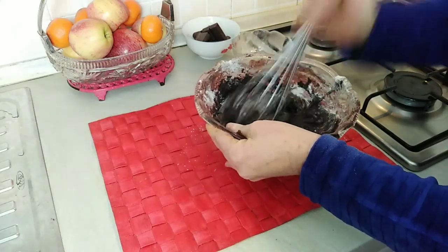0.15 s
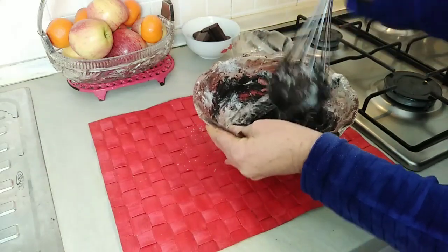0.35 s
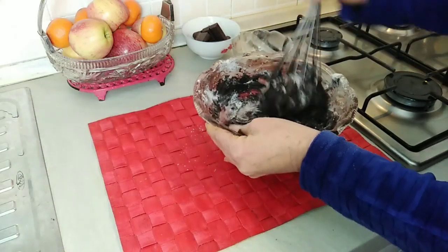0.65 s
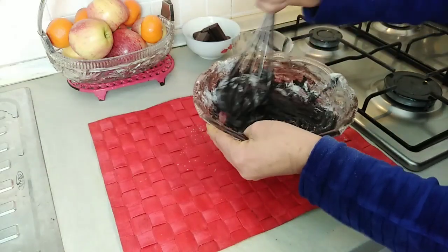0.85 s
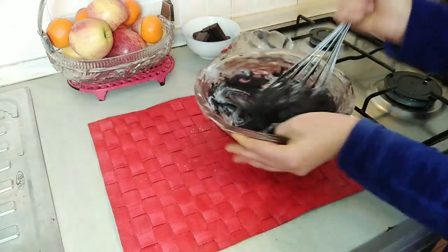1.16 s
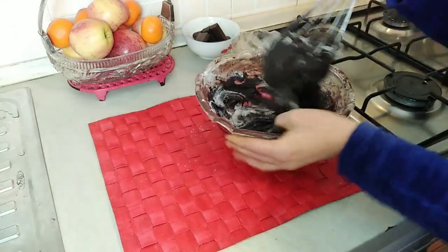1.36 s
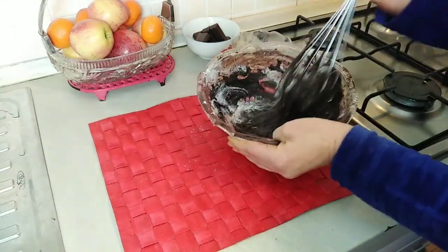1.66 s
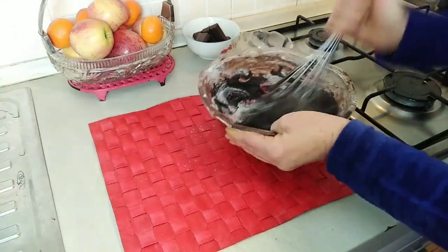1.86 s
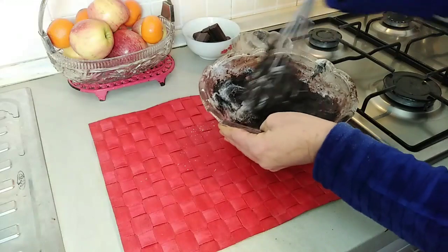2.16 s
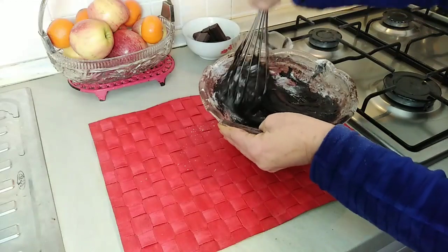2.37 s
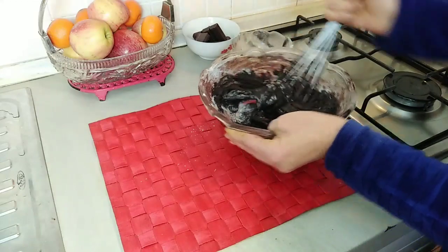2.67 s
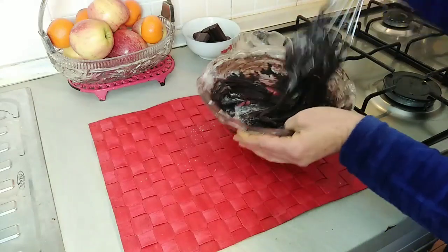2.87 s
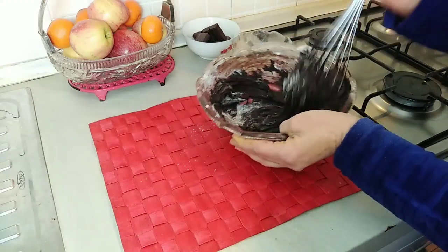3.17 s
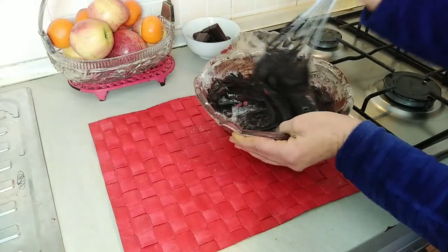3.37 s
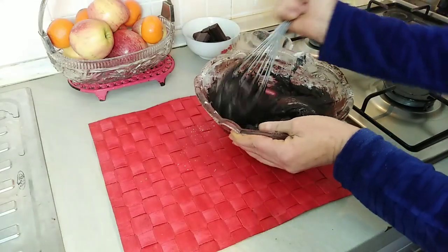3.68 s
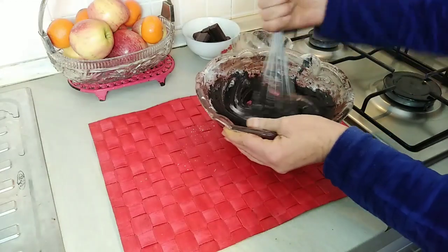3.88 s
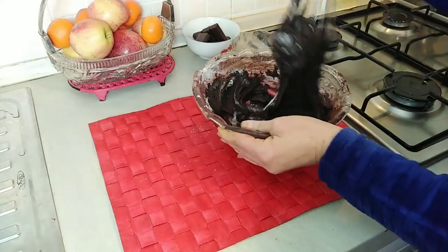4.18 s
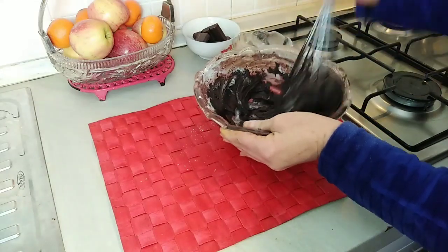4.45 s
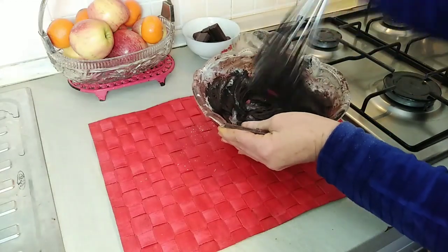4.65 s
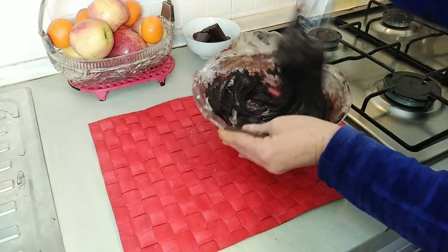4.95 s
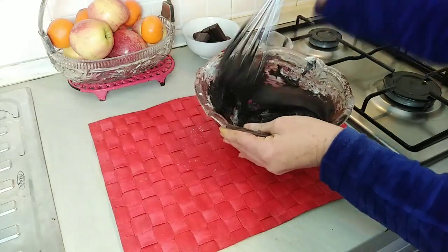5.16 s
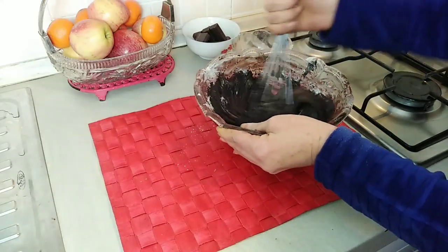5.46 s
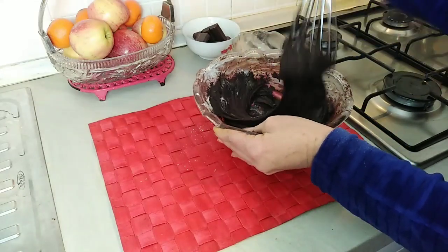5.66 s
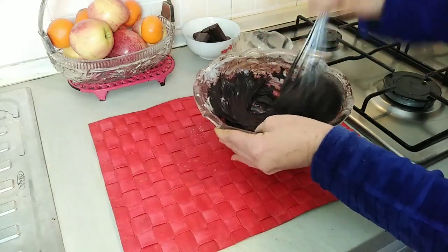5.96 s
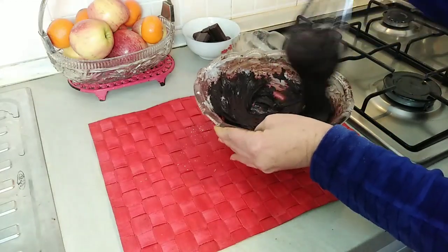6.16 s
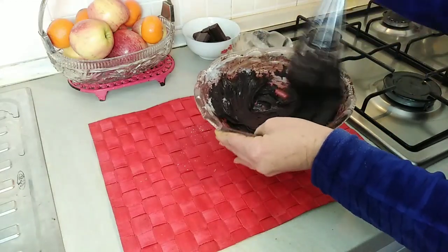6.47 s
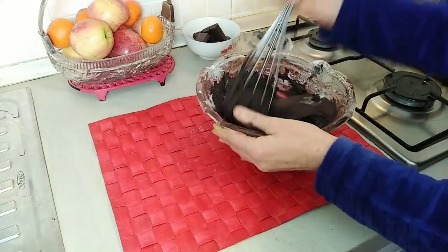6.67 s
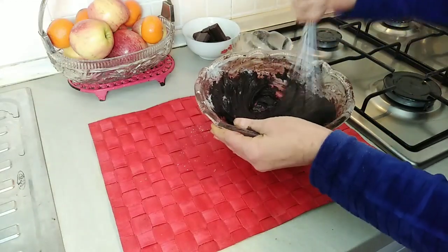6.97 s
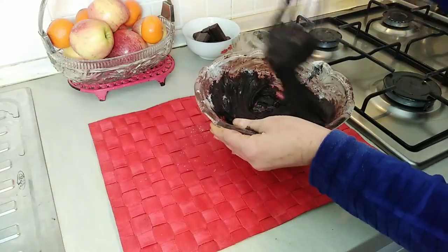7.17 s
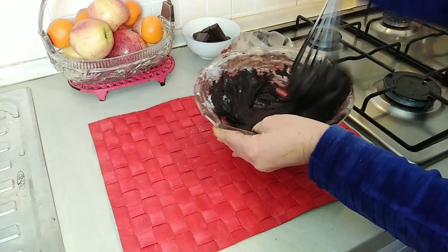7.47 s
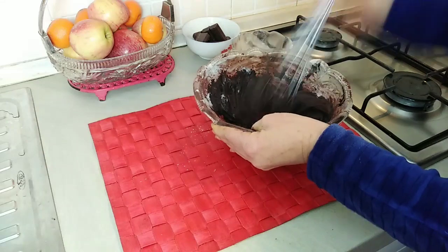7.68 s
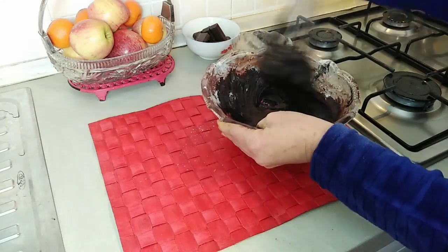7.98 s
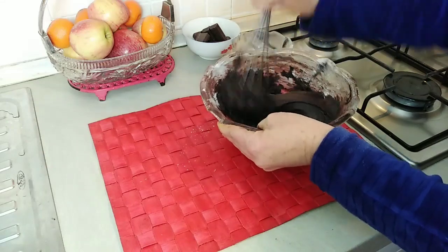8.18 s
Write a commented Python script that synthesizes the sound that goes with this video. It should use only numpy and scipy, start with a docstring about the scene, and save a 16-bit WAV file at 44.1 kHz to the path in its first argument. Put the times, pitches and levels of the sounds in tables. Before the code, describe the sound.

Irregular clacks of a wire whisk on a glass bowl, with sticky batter squelching and scraping softly between them in a kitchen.

```python
"""First comes a soft, wet scrape, then a knock: a wire whisk is beating thick batter in a glass bowl.
The wires drag through the sticky batter and hit the glass, which rings and thumps the counter under
its mat. Air pockets squelch, threads of batter snap, a fridge hums behind, and the tiled room echoes.
Two microphone ports ring in the treble, and a noise suppressor darkens the quiet moments."""
import sys
import numpy as np
from scipy import signal
from scipy.fft import rfft, irfft, next_fast_len
from scipy.io import wavfile
from scipy.ndimage import uniform_filter1d, map_coordinates

SR = 44100
rng = np.random.default_rng(int(sys.argv[2]) if len(sys.argv) > 2 else 0)


def log_audio(samples):
    """Write samples as a 16-bit WAV file to the path given in sys.argv[1]."""
    # one column per channel
    frames = np.atleast_2d(samples).T
    # limit to full scale, then quantise
    limited = np.clip(frames, -1, 1)
    pcm = np.round(limited * 32767).astype(np.int16)
    wavfile.write(sys.argv[1], SR, pcm)


N = 367353


def amp(db):
    """Turns decibels into a number to multiply by."""
    return 10 ** (np.asarray(db) / 20)


def unit(x):
    """Scales x to an average (rms) level of 1."""
    return x / np.sqrt(np.mean(x ** 2) + 1e-20)


def unit_energy(x):
    """Scales x to an energy of 1 per channel."""
    return unit(x) / np.sqrt(x.shape[-1])


def along(points, hz):
    """Reads between a table's (Hz, value) rows, with octaves evenly spaced."""
    row_hz, values = np.transpose(points)
    return np.interp(np.log(hz + 1), np.log(row_hz + 1), values)


def wobble(rate):
    """A smooth curve through rate random values a second."""
    return map_coordinates(rng.standard_normal(int(N * rate / SR) + 4), [np.arange(N) * rate / SR])


def crackle(n, rate):
    """Tiny clicks of random size, about rate a second."""
    return rng.standard_normal(n) * (rng.random(n) < rate / SR)


def filtered(x, response):
    """Multiplies each frequency in x by response(hz)."""
    n = x.shape[-1]
    padded = next_fast_len(n + SR // 10)
    return irfft(rfft(x, padded) * response(np.fft.rfftfreq(padded, 1 / SR)), padded)[..., :n]


def coloured(x, spectrum, size=2048):
    """Gives x the tone colour of a table of (Hz, dB) rows."""
    cepstrum = irfft(np.log(amp(along(spectrum, np.fft.rfftfreq(size, 1 / SR)))))
    # Fold the filter so that it rings only after a click, never before.
    cepstrum[1:size // 2] *= 2
    cepstrum[size // 2 + 1:] = 0
    return signal.fftconvolve(x, irfft(np.exp(rfft(cepstrum))))[:len(x)]


# Sound in the room. Each row: frequency in Hz, how alike left and right are (1 same, 0 unrelated).
LIKENESS = [(150, 0.94), (350, 0.51), (600, .42), (1100, 0), (3000, 0)]

def diffuse(n):
    """Stereo noise arriving from all sides: alike in the bass, unrelated in the treble."""
    def mid_and_side(hz):
        angle = np.arccos(np.clip(along(LIKENESS, hz), -1, 1)) / 2
        return np.array([np.cos(angle), np.sin(angle)])
    mid, side = filtered(rng.standard_normal((2, n)), mid_and_side)
    return np.array([mid + side, mid - side])


def tones(rows, waver_db, drift, rate):
    """Long tones whose level and phase waver, rate times a second."""
    t = np.arange(N) / SR
    out = np.zeros(N)
    for hz, db in rows:
        peak = amp(db + waver_db * wobble(rate)) * np.sqrt(2)
        out += peak * np.sin(2 * np.pi * hz * t + drift * wobble(rate))
    return out


# The fridge's hum and its whine. Each row: pitch in Hz, level in dB that the tone wavers around.
FRIDGE_HUM = [(48.6, -90), (97.5, -71.5), (146, -67.5), (197, -75), (245, -84.5), (293, -77.5)]
FRIDGE_WHINE = [(2110, -91.5), (2159, -83), (2207, -81.5), (2257, -72), (2306, -81.5)]
# The hush of the still room. Each row: frequency in Hz, relative level in dB.
ROOM_HUSH = [(20, -17.5), (60, 8.5), (150, -1.5), (310, 2), (400, -23.5), (600, -11.5), (1000, -18.5),
             (2000, -18.5), (2900, -26), (4500, -17), (15000, -47)]

def fridge(swell_db=4, swell_period_s=9.7, loudest_s=0.58):
    """The compressor hums over the room's hush, while its thin, rough whine slowly swells and fades."""
    t = np.arange(N) / SR
    whine_db = swell_db * np.cos(2 * np.pi * (t - loudest_s) / swell_period_s)
    whine = amp(whine_db) * tones(FRIDGE_WHINE, waver_db=2.5, drift=0.41, rate=12)
    hush = unit(filtered(diffuse(N), lambda hz: amp(along(ROOM_HUSH, hz))))
    hum = tones(FRIDGE_HUM, waver_db=1, drift=0.64, rate=2.7)
    return hum + whine + amp(-66.5) * hush


# The tiled room's echo. Each row: frequency in Hz, seconds it takes to fade by 60 dB.
ECHO_FADE = [(60, 0.82), (160, 1), (420, 0.6), (1100, 0.64), (2900, 0.64), (7700, 0.51), (14000, 0.46)]

def kitchen(x, near_db, tail_db, near_fade_s=0.082):
    """Adds quick bounces off bowl and tiles and a longer echo, new for each position of the whisk."""
    hz, t, bands = signal.stft(diffuse(SR), SR, nperseg=256)
    fade = amp(-60 * t / along(ECHO_FADE, hz)[:, None])
    tail = signal.istft(bands * fade, SR, nperseg=256)[1][:, :SR]
    t = np.arange(SR // 10) / SR
    near = diffuse(len(t)) * amp(-60 * t / near_fade_s)
    echo = amp(tail_db) * unit_energy(tail)
    echo[:, :len(t)] += amp(near_db) * unit_energy(near)
    echo[:, 0] += 1  # the sound that arrives directly
    return signal.fftconvolve(x[None], echo / np.linalg.norm(echo[0]), axes=1)[:, :len(x)]


def add(out, x, s):
    """Mixes x into out, starting at s seconds."""
    start = round(s * SR)
    out[:, start:start + x.shape[1]] += x[:, :N - start]


# Threads of batter breaking. Each row: start in seconds, relative level in dB.
THREAD_SNAPS = [(1.135, -36), (1.42, -47), (3.048, -40), (5.718, -53), (6.66, -50.5), (7.2, -34.5),
                (7.297, -40.5)]
# The tone colour of one snap. Each row: frequency in Hz, relative level in dB.
SNAP_COLOUR = [(3000, -39), (5500, -25.5), (7500, -2.5), (11000, 1.5), (14000, -0.5)]

def snaps(tear_s=0.002):
    """A thin thread of batter tears off the lifted whisk with a tiny, very high tick."""
    out = np.zeros((2, N))
    pull = np.exp(-np.arange(SR) / SR / tear_s)
    for s, db in THREAD_SNAPS:
        tick = unit_energy(coloured(pull * crackle(SR, rate=7200), SNAP_COLOUR))
        add(out, kitchen(amp(db + 8.5) * tick, near_db=1.5, tail_db=-3.5), s)
    return out


# Big air pockets. Each row: loudest moment in seconds, relative level in dB, pitch in Hz,
# seconds to swell or fade.
AIR_POCKETS = [(1.318, -58, 674, 0.026), (1.401, -64, 597, 0.075), (1.966, -76, 780, 0.015),
               (2.615, -60, 1000, 0.029), (3.436, -65, 1200, 0.075), (3.773, -50.5, 1130, 0.017),
               (5.355, -44, 1145, .008), (5.858, -70, 644, 0.019), (8.203, -46, 1993, 0.0051)]

def squishes(waver=0.075, lead_s=0.2):
    """Air forced out of a pocket in the batter makes it sound a short, unsteady note."""
    out = np.zeros((2, N))
    t = np.arange(SR) / SR - lead_s
    for s, db, hz, fade_s in AIR_POCKETS:
        pitch = hz * (1 + waver * wobble(150)[:SR])
        note = np.sin(2 * np.pi * np.cumsum(pitch) / SR) * np.exp(-(t / fade_s) ** 2)
        add(out, kitchen(amp(db + 4) * note, near_db=-1, tail_db=-1.5), s - lead_s)
    return out


def ring(notes, scatter_db, attack_s):
    """A struck object sounds all its natural notes together, at new strengths every time."""
    t = np.arange(SR) / SR
    hz, db, fade_s = np.transpose(notes)[:, :, None]
    strength = amp(db + scatter_db * rng.standard_normal(hz.shape))
    sound = np.sum(strength * np.sin(2 * np.pi * hz * t) * amp(-60 * t / fade_s), axis=0)
    return unit_energy(sound * (1 - np.exp(-t / attack_s)))


# The counter's low notes. Each row: pitch in Hz, relative level in dB, seconds to fade by 60 dB.
COUNTER_NOTES = [(75, -14.5, 0.68), (100.73, -6.5, 0.78), (124.2, 0, 0.27), (115.8, 10, 0.087),
                 (157.2, -0.5, 0.32), (180.6, -6.5, 0.43)]

def counter_thud(scatter_db, attack_s):
    """A push through the mat makes the counter boom briefly."""
    return ring(COUNTER_NOTES, scatter_db, attack_s)


# The bowl rocking. Each row: start in seconds, relative level in dB.
BOWL_ROCKS = [(0.131, -47), (3.88, -52), (4.661, -47.5), (6.562, -41.5), (6.659, -53)]

def rocking():
    """The bowl tips back onto the mat and softly thumps the counter."""
    out = np.zeros((2, N))
    for s, db in BOWL_ROCKS:
        thud = amp(db + 25.5) * counter_thud(scatter_db=3.5, attack_s=0.006)
        add(out, kitchen(thud, near_db=-13, tail_db=-12.5), s)
    return out


def bubbles(rate, pitch_hz, spread, cycles, size=700):
    """Small air pockets pop open, rate a second: quickly fading notes of scattered pitch and strength."""
    start, a, b, strength = rng.random((int(rate * N / SR), 4)).T[:, :, None]
    hz = pitch_hz * np.exp(spread * (a + b - 1))  # most land near pitch_hz
    age = np.arange(size)
    phase = hz * age / SR
    pops = strength * np.sin(2 * np.pi * phase) * np.exp(-phase / cycles) * (1 - age / size)
    places = (start * N).astype(int) + age
    return np.bincount(places.ravel(), pops.ravel(), minlength=N)[:N]


def patchy(x, depth_db, width_hz, patch_s):
    """Hollows in the batter open and close, so patches of high and low sound come and go."""
    bands = signal.stft(x, nperseg=1024)[2]
    rows, cols = np.indices(bands.shape)
    place = [rows * SR / 1024 / width_hz, cols * 512 / SR / patch_s]
    grid = rng.standard_normal([int(p.max()) + 2 for p in place])
    patches = map_coordinates(grid, place, order=1)
    return unit(signal.istft(bands * amp(depth_db * patches), nperseg=1024)[1][:N])


def circling(x, turns_per_s, spots=4):
    """The whisk circles past several spots in the bowl, each with its own echo."""
    angle = 2 * np.pi * turns_per_s * np.arange(N) / SR + wobble(3)
    shares = [np.maximum(0, np.cos(angle - 2 * np.pi * k / spots)) for k in range(spots)]
    return sum(kitchen(share * x, near_db=10, tail_db=3) for share in shares)


def swell(start, length, db, rise, sag, fall):
    """One movement's level: rises to db at start, sags for length, then falls (all in dB a second)."""
    t = np.arange(N) / SR - start
    return db - rise * np.maximum(-t, 0) - sag * np.clip(t, 0, length) - fall * np.maximum(t - length, 0)


# Sweeps through the batter. Each row: start in seconds, length in seconds, then the relative levels
# in dB of wire scrape and batter squelch.
WHISK_STROKES = [(0.0, 0.013, -58, -57), (0.22, 0.22, -59.5, -66), (0.932, 0.17, -50, -54),
                 (1.302, 0.3, -60.5, -72), (1.758, 0.044, -59, -74), (1.85, 0.13, -56.5, -59.5),
                 (2.365, .28, -57, -58.5), (3.244, 0.22, -61, -54), (3.74, 0.18, -52, -51),
                 (4.564, 0.082, -57, -61), (4.737, 0.1, -56, -59), (5.268, 0.076, -50, -54.5),
                 (5.389, 0.13, -56, -55.5), (6.227, 0.063, -57.5, -58), (6.524, 0.054, -60.5, -72.5),
                 (6.786, 0.14, -51.5, -56), (7.52, 0.13, -55.5, -61.5), (8.003, 0.029, -73, -63),
                 (8.202, .14, -56, -53.5)]
# Batter peeling off the rising wires. Each row: loudest moment in seconds, relative scrape level in dB.
BATTER_PEELS = [(1.22, -54), (2.11, -64.5), (2.72, -59), (2.83, -61), (4.148, -54.5), (5.18, -63),
                (5.63, -61), (7.1, -62.5)]

def stroke_levels(rise=331.5, sag=4.5):
    """Strokes bite fast, then ease off; scrape outlasts squelch. The strongest movement sets each."""
    scrapes = [swell(s, 0, db, rise=135, sag=0, fall=89) for s, db in BATTER_PEELS]
    squelches = []
    for s, length, scrape_db, squelch_db in WHISK_STROKES:
        scrapes.append(swell(s, length, scrape_db, rise, sag, fall=81.5))
        squelches.append(swell(s, length, squelch_db, rise, sag, fall=109.5))
    return np.max(scrapes, axis=0), np.max(squelches, axis=0)


# Tone colours of scraping wires and tearing batter. Each row: frequency in Hz, relative level in dB.
SCRAPE_COLOUR = [(600, -26.5), (1500, -2), (2300, 2), (3200, -3), (4200, -4.5), (6000, -5), (9000, -6),
                 (12000, -8.5), (15000, -14.5)]
BATTER_COLOUR = [(40, -19.5), (120, 6.5), (330, 2), (480, 1), (800, -5.5), (1200, -2.5), (1800, -14),
                 (3000, -16), (8000, -38)]

def stirring():
    """Wires slide over the glass while the batter tears and squelches around them."""
    scrape_db, squelch_db = stroke_levels()
    drag = wobble(35)  # the wires stick and slip
    grit = coloured(crackle(N, rate=2200), SCRAPE_COLOUR)
    grit = patchy(grit, depth_db=3.5, width_hz=220, patch_s=0.06)
    scrape = amp(scrape_db - 5 + 0.49 * drag) * grit
    tearing = coloured(crackle(N, rate=700), BATTER_COLOUR)
    tearing = patchy(tearing, depth_db=3.5, width_hz=130, patch_s=0.045)
    pops = unit(bubbles(rate=300, pitch_hz=900, spread=1, cycles=4))
    squelch = amp(squelch_db + 2 * drag) * (tearing + amp(-8.5) * pops)
    return circling(scrape + squelch, turns_per_s=2.5)


# Tone colours of wire hitting glass. Each row: frequency in Hz, relative level in dB.
CLICK_COLOUR = [(1000, -19), (2500, -9.5), (4000, -9.5), (6000, -2.5), (9000, -4), (12000, -6.5),
                (15000, -12)]
KNOCK_COLOUR = [(60, -29.5), (200, 0), (400, 0.5), (800, 2), (1100, -3), (1700, -5.5), (2400, -6.5),
                (3200, -13), (6000, -20.5), (15000, -60.5)]

def contact(force, click_db, knock_db):
    """One wire lands hard and the others chatter: a bright click over a knock dulled by batter."""
    first_wire = amp(-6) * signal.unit_impulse(len(force), np.argmax(force))
    def wires(colour):
        chatter = unit_energy(force * crackle(len(force), rate=8000))
        return unit_energy(coloured(first_wire + chatter, colour))
    return amp(click_db) * wires(CLICK_COLOUR) + amp(knock_db) * wires(KNOCK_COLOUR)


# Wires clicking on glass. Each row: start in seconds, then the relative levels in dB of click and knock.
WIRE_CLICKS = [(.135, -49.5, -71.5), (.24, -56.5, -43), (0.555, -32.5, -33.5), (0.5606, -9, -29.5),
               (1.552, -34, -29), (1.5673, -41, -32), (2.964, -50, -63.5), (3.766, -50, -56),
               (3.873, -42, -44.5), (4.375, -43.5, -47.5), (4.392, -24.5, -30.5), (5.235, -43.5, -56.5),
               (5.344, -36.5, -43.5), (5.924, -30.5, -28.5), (5.935, -7.5, -23), (6.567, -49, -55),
               (7.347, -31.5, -36.5), (7.358, -19, -22.5), (7.719, -41, -37.5), (7.7435, -10, -22.5),
               (8.179, -44, -58)]

def wire_clicks(chatter_s=0.0014):
    """Wires click and chatter on the glass, from faint ticks to sharp cracks around the main blows."""
    out = np.zeros((2, N))
    force = np.exp(-np.arange(SR) / SR / chatter_s)
    for s, click_db, knock_db in WIRE_CLICKS:
        click = contact(force, click_db + 11.5, knock_db + 26.5)
        add(out, kitchen(click, near_db=10, tail_db=4), s)
    return out


# The bowl's notes, muffled by batter. Each row: pitch in Hz, relative level in dB, seconds to fade
# by 60 dB.
BOWL_NOTES = [(238.3, -5.5, .3), (267, -3, 0.45), (302.6, -0.5, 0.27), (318.3, 13, .06), (361.3, -5.5, .25),
              (380, 0.5, 0.12), (554, -10, 0.3), (696, -7, .3), (757, -8.5, 0.2), (853, -10.5, 0.21),
              (1214, -15.5, 0.21), (2370, -19, .28)]
# Full hits on the bowl. Each row: moment in seconds, then the relative levels in dB of wire click,
# knock, bowl ring and counter thud.
WHISK_BLOWS = [(0.2493, -32, -37.5, -40, -40), (0.562, -17, -22.5, -32, -26.5),
               (1.5613, -18, -29.5, -34.5, -39), (1.8595, -29, -47.5, -62, -53),
               (3.0913, -24, -31.5, -50, -58), (4.4097, -17, -30, -34, -33), (4.77, -31, -38.5, -48.5, -62),
               (5.2729, -44, -65, -47, -35.5), (5.943, -6.5, -17.5, -28, -29),
               (6.3153, -18, -23.5, -35, -34), (6.761, -40.5, -50, -46.5, -32.5),
               (7.3707, -9, -23.5, -25.5, -28.5), (7.737, -12.5, -20.5, -24.5, -28),
               (8.2226, -34, -49.5, -54, -36)]

def blows(plunge_db=-15, plunge_s=0.0084, chatter_s=0.0036, lead_s=0.04):
    """The whisk plunges through the batter, then lands on the glass; bowl and counter ring."""
    out = np.zeros((2, N))
    t = np.arange(SR) / SR - lead_s
    plunge = amp(plunge_db) * np.exp(-abs(t) / plunge_s)
    landing = np.exp(-abs(t) / chatter_s)
    force = np.where(t < 0, plunge, landing)
    for s, click_db, knock_db, bowl_db, thud_db in WHISK_BLOWS:
        hit = contact(force, click_db + 9.5, knock_db + 25)
        add(out, kitchen(hit, near_db=3.5, tail_db=1.5), s - lead_s)
        bowl = amp(bowl_db + 33) * ring(BOWL_NOTES, scatter_db=5, attack_s=0.0025)
        thud = amp(thud_db + 32.5) * counter_thud(scatter_db=3.55, attack_s=0.004)
        add(out, kitchen(bowl + thud, near_db=-19.5, tail_db=-9.5), s)
    return out


def scene():
    """Whisk, bowl and batter, with the fridge behind them."""
    return blows() + wire_clicks() + rocking() + stirring() + squishes() + snaps() + fridge()


# What the suppressor treats as noise. Each row: frequency in Hz, threshold in dB.
NOISE_THRESHOLD = [(100, -103), (700, -88.5), (2000, -86.5), (2900, -85.5), (4000, -88), (6000, -91),
                   (9000, -87.5), (14000, -104)]

def suppressor(x, depth_db=-18):
    """Turns down each narrow band of frequencies while it is quieter than the threshold."""
    hz, _, bands = signal.stft(x, SR, nperseg=1024)
    power = np.mean(abs(bands) ** 2, axis=0)
    power = uniform_filter1d(power, size=3, axis=0)  # smooth across frequency
    power = abs(uniform_filter1d(power, size=3, axis=1))  # and across time
    excess = (power / amp(along(NOISE_THRESHOLD, hz))[:, None] ** 2) ** 2
    gain = (excess + amp(depth_db)) / (excess + 1)
    return signal.istft(bands * gain, nperseg=1024)[1][:, :N]


# The microphone's two small openings, left then right. Each row: ringing pitch in Hz, width in Hz.
MIC_PORTS = [(8284, 1280), (7440, 1470)]
# The stereo balance. Each row: frequency in Hz, boost of left over right in dB.
LEFT_BOOST = [(100, 0.5), (200, 4), (370, 3.5), (700, 1), (2400, 3.5), (4400, 1), (7000, 0), (9000, 4),
              (14000, 6.5)]

def record(dry, low_cut_hz=42, top_hz=15100):
    """The microphone ports ring; then deep bass is cut, noise turned down and the highest treble cut."""
    def microphone(hz):
        ports = np.array([pitch**2 / (pitch**2 - hz**2 + 1j * hz * width) for pitch, width in MIC_PORTS])
        balance = amp(along(LEFT_BOOST, hz) * np.array([[0.5], [-0.5]]))
        return ports * balance
    bass_cut = signal.butter(2, low_cut_hz, "highpass", fs=SR, output="sos")
    treble_cut = signal.cheby1(18, 0.5, top_hz, fs=SR, output="sos")
    heard = signal.sosfilt(bass_cut, filtered(dry, microphone))
    return signal.sosfilt(treble_cut, suppressor(heard))


dry = scene()
out = record(dry)
log_audio(out)
```